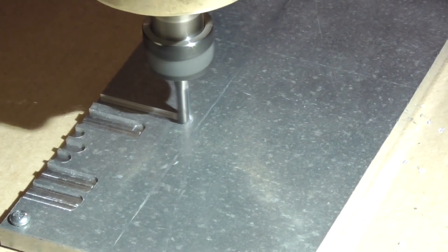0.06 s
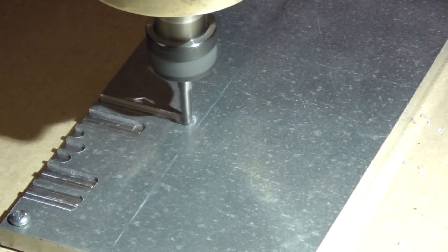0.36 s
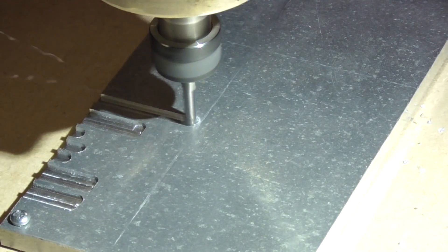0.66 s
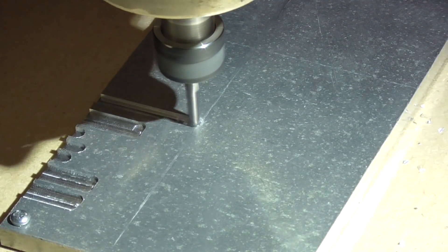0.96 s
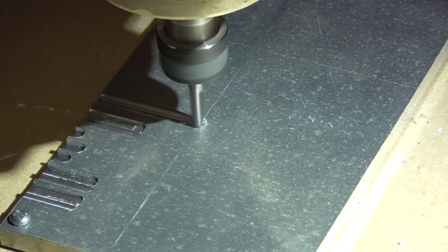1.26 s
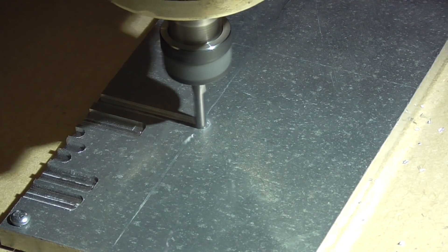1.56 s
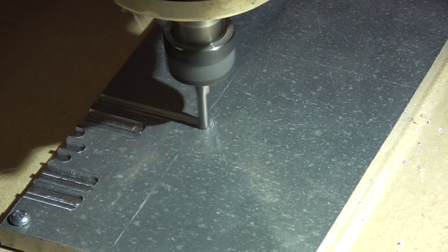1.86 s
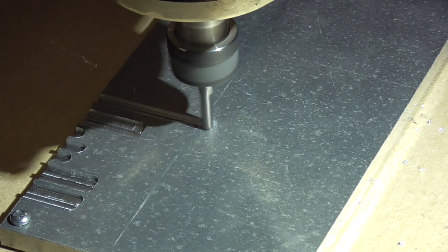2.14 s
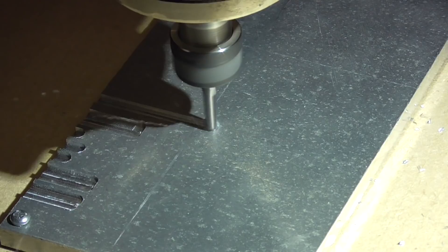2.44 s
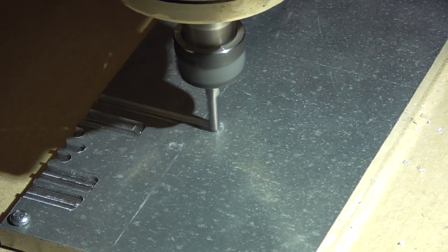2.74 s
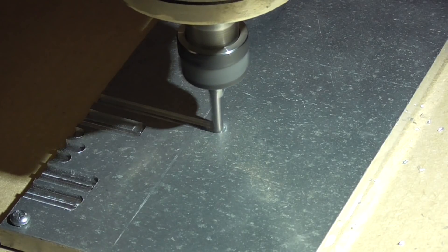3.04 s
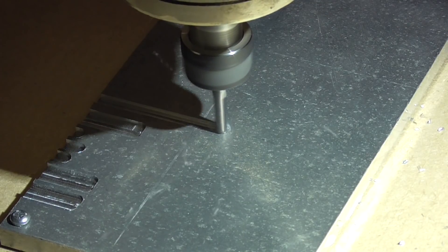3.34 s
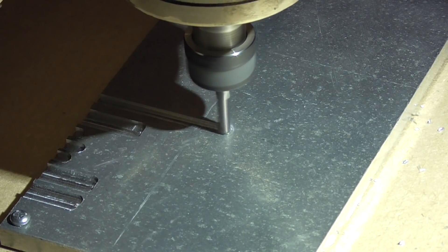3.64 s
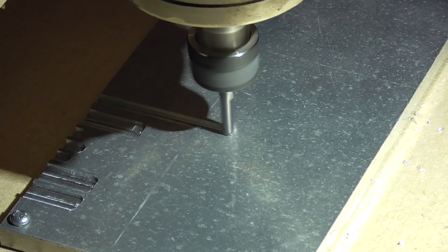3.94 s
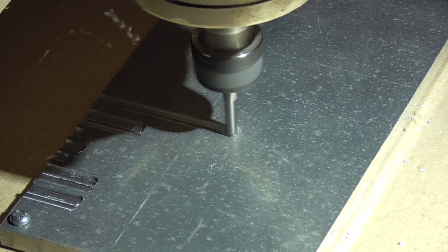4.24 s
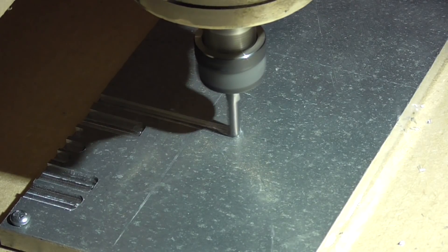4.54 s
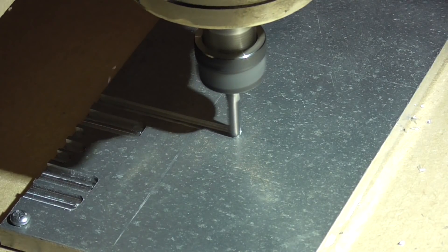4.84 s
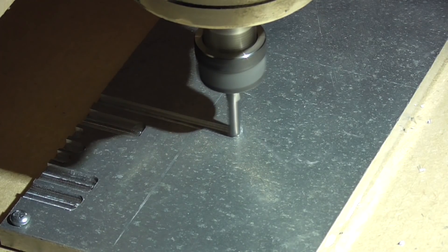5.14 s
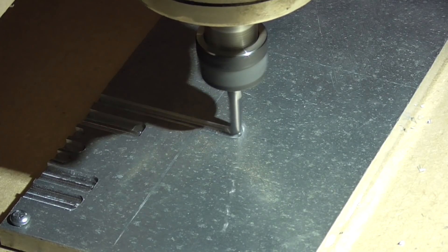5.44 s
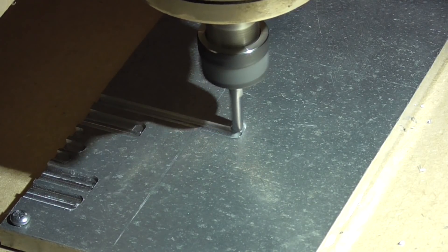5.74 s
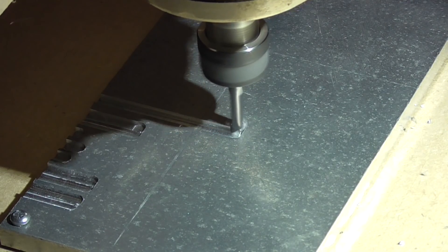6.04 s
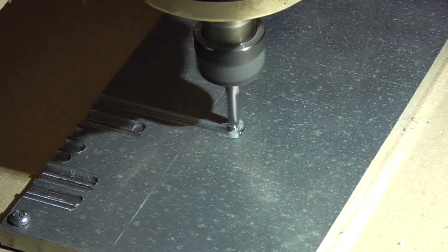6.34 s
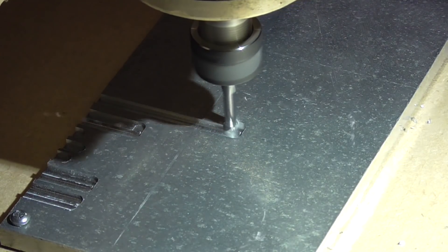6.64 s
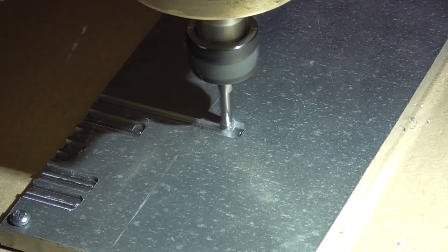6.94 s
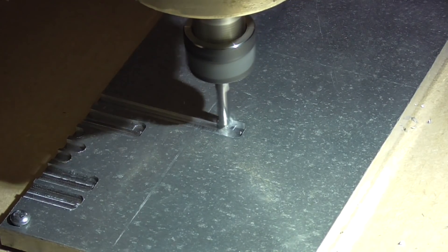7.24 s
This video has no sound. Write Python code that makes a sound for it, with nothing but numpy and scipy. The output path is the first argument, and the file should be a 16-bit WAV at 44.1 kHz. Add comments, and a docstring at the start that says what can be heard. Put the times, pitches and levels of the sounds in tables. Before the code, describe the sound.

A router spindle mills an aluminium plate, heard close up in a workshop. Its steady high whine and motor whistle sit over a cooling fan, while chips hiss and the cutter chatters in ringing bursts. Past halfway the cutter lifts with a brief, piercing squeal, then plunges into the plate with a harder, buzzing drone. At the very end the sound drops abruptly to a thin whine.

```python
"""A router spindle at about 16400 rpm mills an aluminium plate, close by in a workshop.
Over fan, bearings and the whistle of the motor drive, the cutter runs along a slot: its flutes force
the plate to vibrate, chips hiss and chatter comes in bursts. At 4.7 s it rises and friction makes it
squeal. At 5.2 s it plunges into the plate with a harder drone, knocking once a turn.
At 7.3 s the sound drops abruptly to a thin whine."""
import sys
import numpy as np
from scipy import signal
from scipy.fft import rfft, irfft, next_fast_len
from scipy.io import wavfile
from scipy.ndimage import uniform_filter1d

SR = 44100
rng = np.random.default_rng(int(sys.argv[2]) if len(sys.argv) > 2 else 0)


def pcm_store(signal):
    """Save signal as 16-bit PCM."""
    levels = np.round(np.clip(np.atleast_2d(signal), -1, 1) * 32767)
    wavfile.write(sys.argv[1], SR, levels.astype(np.int16).T)


N = 330309
TIME = np.arange(N) / SR
SPINDLE_HZ = 273.85
SLOT_END_S, TOUCH_S, WHINE_START_S = 4.66, 5.18, 7.3423


def amp(db):
    """Decibels to amplitude ratio."""
    return 10 ** (np.asarray(db) / 20)


def curves(rows):
    """Linear interpolation in time of each column after the first."""
    time_s, *columns = np.transpose(rows)
    return [np.interp(TIME, time_s, column) for column in columns]


def swell(at_s, length_s):
    """Gaussian envelope of height 1."""
    return np.exp(-((TIME - at_s) / length_s) ** 2)


def span(start_s, attack_s, end_s, release_s):
    """Trapezoidal envelope: attack, hold at 1 until end_s, release."""
    return np.clip((TIME - start_s) / attack_s, 0, 1) * np.clip(1 - (TIME - end_s) / release_s, 0, 1)


def drift(rate_hz):
    """Slow random fluctuation of rms about 1."""
    knots = rng.standard_normal(4096)
    return 1.16 * np.interp(TIME * 2 * rate_hz, np.arange(len(knots)), knots)


def cycle(turns):
    """Phase in radians within the current turn."""
    return (2 * np.pi * (turns - np.floor(turns))).astype(np.float32)


def tone(turns, waver=0., lead=None, start=None):
    """Sinusoid of rms 1 plus random modulation; with lead, a pair whose left is ahead by lead radians."""
    angle = cycle(turns + (rng.random() if start is None else start))
    if lead is not None:
        angle = angle + np.float32([[lead / 2], [-lead / 2]])
    if not waver:
        return np.sqrt(2) * np.cos(angle)
    return (np.sqrt(2) + waver * drift(14)) * np.cos(angle) + waver * drift(14) * np.sin(angle)


def pan(x, left_db):
    """Placement by level difference; left_db is left minus right."""
    gains = amp([[left_db / 2], [-left_db / 2]])
    return x * (gains / gains.mean())


def resonate(x, hz, width_hz):
    """Damped resonance of peak gain 1; hz may vary in time."""
    angle = cycle(np.cumsum(hz * np.ones(len(x))) / SR)
    pole = np.exp(-np.pi * width_hz / SR)
    carriers = np.cos(angle), np.sin(angle)
    return 2 * sum(carrier * signal.lfilter([1 - pole], [1, -pole], x * carrier) for carrier in carriers)


# Hollows in every noise spectrum: centre_hz, half_width_hz, gain_db
HOLLOWS = [(1730, 55, -3.5), (2593, 58, -9.5), (2980, 130, -4.5), (4110, 68, -5), (5010, 136, -10),
           (6110, 44, -4)]

def noise(spectrum, memory=0., edge_db=40, turn_hz=SPINDLE_HZ, shift_hz=0):
    """Comb filtering: shaped noise repeats the share memory of the turn before, so lines emerge."""
    hz, db = np.transpose(spectrum)
    size = next_fast_len(N, True)
    f = np.fft.rfftfreq(size, 1 / SR) + 1e-3
    octaves_outside = abs(np.log2(f / np.clip(f, hz[0], hz[-1])))
    hollows_db = sum(dip_db / (1 + ((f - dip_hz) / width) ** 2) for dip_hz, width, dip_db in HOLLOWS)
    gain = amp(np.interp(np.log(f), np.log(hz), db) + hollows_db - edge_db * octaves_outside)
    comb = np.sqrt(1 - memory ** 2) / (1 - memory * np.exp(-2j * np.pi * (f - shift_hz) / turn_hz))
    return irfft(rfft(rng.standard_normal(size)) * gain * comb, size)[:N] * np.sqrt(SR / 2)


# Set speed of the spindle: time_s, speed_hz
SPEED = [(0, 273.7), (4.6, 273.8), (4.75, 274.4), (5.25, 274.4), (5.7, 273.8), (6.1, 274.05)]

def spindle_turns(hunt_hz=5.1, hunt=0.00022):
    """Shaft angle in turns, the integral of a slightly hunting speed; order k has k cycles a turn."""
    hunting = 1 + hunt * np.sin(2 * np.pi * hunt_hz * TIME) + 0.0002 * drift(8)
    return np.cumsum(curves(SPEED)[0] * hunting) / SR


def feed_angle(feed_hz=1.9, peak_s=0.35):
    """Phase of the slow modulation imposed by travel along the slot."""
    return 2 * np.pi * feed_hz * (TIME - peak_s)


# Harmonics of the shaft: order; relative_db
SHAFT_ORDERS = [5, 6, 8, 14, 20, 21, 26, 28]
SHAFT_DB = [-61, -58, -53.5, -60, -52.5, -57, -50, -63.5]

def motor(turns, clear, load_db, flutter_hz=11.2):
    """Harmonics of rotation: shaft tones and a fluttering 16th-order whine, weaker out of the cut."""
    # Orders shared with the knock are in quadrature with it, so the two never cancel.
    shaft = sum(amp(db) * tone(k * turns, waver=0.32, start=1 / 4 if k in KNOCK_ORDERS else None)
                for k, db in zip(SHAFT_ORDERS, SHAFT_DB))
    level = amp(-44.5 - 11.0 * clear ** 2 + 0.42 * load_db - 1.2 * full_cut())
    flutter = 1 + 0.091 * tone(flutter_hz * TIME)
    whine = level * flutter * tone(16 * turns + 0.065 * drift(60), waver=0.19)
    return pan(shaft * amp(-1.5 - 6.9 * clear), left_db=6.0) + pan(whine, left_db=1.0)


# Tones of the motor drive, and its highest one: pitch_hz, level_db
DRIVE = [(4627, -40.5), (5452, -62.5), (5726, -52), (6551, -58.5), (7375, -51.5), (11451, -61)]
DRIVE_TOP = [(12550, -58.5)]

def drive_whistle(in_slot, echo=0.21):
    """Interference: the drive's whistle meets its own echo as the spindle travels."""
    whistle = sum(amp(db) * tone(hz * TIME + 0.02 * drift(50), waver=0.17) for hz, db in DRIVE + DRIVE_TOP)
    interference = abs(1 - echo * in_slot * np.exp(1j * feed_angle()))
    return pan(whistle * interference, left_db=-2.0)


# Tones of the frame: pitch_hz, relative_db
FRAME_HUM = [(72, -85.5), (143.5, -67), (238, -76.5)]

def frame_hum(clear):
    """Forced vibration: the frame hums under load and eases when the cutter is clear."""
    hum = sum(amp(db) * tone(hz * TIME, waver=0.086) for hz, db in FRAME_HUM)
    return pan(hum * amp(-2 - 15.4 * clear), left_db=-1.8)


def bearing_tone(pitch_hz=994.0, fade_db=4.5):
    """Random amplitude modulation: a bearing tone comes and goes."""
    level = amp(-53.5 + fade_db * np.tanh(1.2 * drift(3.5)))
    return pan(level * tone(pitch_hz * TIME, waver=0.35), left_db=6.0)


BEAT_HZ = 35.9

def bearing_beat(turns, clear):
    """Beating: a bearing tone lies just above the rotation frequency and grows late in the plunge."""
    level = amp(-66.5) * (1 - clear) + amp(-51.5) * swell(7.27, 0.26)
    return pan(level * tone(turns + BEAT_HZ * TIME), left_db=-4.0)


# Envelope of the once-a-turn hum: time_s, level_db
TURN_HUM = [(0.0, -64.5), (0.55, -51.5), (1.83, -49), (2.19, -60.5), (2.43, -64), (2.53, -56),
            (3.84, -50.5), (4.55, -49), (4.63, -56), (5.08, -46.5), (5.24, -52.5), (7.3, -49.5)]

def turn_hum(turns, in_slot):
    """The fundamental of rotation; it shifts to the right as the cutter leaves the slot."""
    hum = amp(curves(TURN_HUM)[0]) * tone(turns, waver=0.12, lead=0.32)
    return pan(hum * in_slot, left_db=-0.5) + pan(hum * (1 - in_slot), left_db=-10)


# Spectrum of the cooling fan: frequency_hz, density_db
FAN = [(25, -115.8), (60, -107.0), (120, -95), (180, -95.5), (230, -83), (400, -85.5), (580, -80.5),
       (700, -68), (850, -73), (1000, -80), (1200, -76), (1750, -90.5), (2000, -83), (2600, -85.5)]

def fan(clear, rumble_hz=330):
    """Flow noise of air through the housing; the frame's rumble eases while the cutter is clear."""
    loaded = noise(FAN)
    unloaded = signal.sosfilt(signal.butter(1, rumble_hz, "high", fs=SR, output="sos"), noise(FAN))
    air = loaded * np.sqrt(1 - clear) + amp(-1.5) * unloaded * np.sqrt(clear)
    return air * amp(0.33 + .5 * drift(4.6))


# Force of the side cut: time_s, level_db
LOAD = [(0.0, -39), (0.1, -35.5), (0.15, -38.5), (0.73, -36), (1.94, -39), (2.01, -44), (3.19, -39.5),
        (4.55, -39.5)]
# Envelope of the plate's second order: time_s, relative_db
SECOND_ORDER = [(0.0, -44), (0.58, -53.5), (1.05, -38.5), (2.15, -49), (3.59, -46.5), (3.67, -51),
                (4.55, -47.5)]
# Its higher harmonics: order; level_db, load_share, feed_swell_db, left_db, lead_rad
SLOT_ORDERS = [3, 4]
SLOT_TONES = [(-41.5, 0.13, 2.5, -2.5, .07), (-36, 0.87, -0.1, -3.5, 0.31)]

def side_cut(turns, in_slot, load_db, graze=.25):
    """Forced vibration: the flutes shake the plate harder under load, swelling with the feed."""
    feed = np.cos(feed_angle())
    second = amp(curves(SECOND_ORDER)[0] + 2) * tone(2 * turns, waver=0.26, lead=2.39)
    shake = pan(second, left_db=-2.5)
    for k, (db, load_share, swell_db, left_db, lead) in zip(SLOT_ORDERS, SLOT_TONES):
        level = amp(db + load_share * load_db + swell_db * feed)
        shake += pan(level * tone(k * turns, waver=0.053, lead=lead), left_db)
    sizzle = amp(-54 + 2.0 * load_db) * tone(28 * turns, waver=0.55)
    grazing = graze * span(SLOT_END_S - .05, .05, SLOT_END_S, 0.46)  # flutes brush the wall on the way up
    return np.maximum(in_slot, grazing) * shake + in_slot * pan(sizzle, left_db=-6)


# Bursts of chatter: start_s, attack_s, end_s, release_s, level_db
CHATTER_BURSTS = [(.085, .03, .4, .4, -44), (1.36, .08, 1.48, .24, -43.5), (1.62, .16, 3.38, .22, -43.3),
                  (1.9, .08, 2.2, 1.4, -40.5), (3.48, .12, 3.8, .5, -42), (4.03, .07, 4.15, .7, -41.5),
                  (4.38, .23, 4.645, .04, -40.5), (5.47, .1, 5.62, .25, -51), (5.71, .08, 6.03, .04, -42)]

def chatter_strength(in_slot, idle_db=-53, tremble_db=.85, tremble_hz=10):
    """Growth and decay of chatter: wavering bursts rise above a weak vibration along the slot."""
    bursts = np.max([amp(db) * span(*timing) for *timing, db in CHATTER_BURSTS], axis=0)
    return np.maximum(bursts, amp(idle_db) * in_slot) * amp(tremble_db * drift(tremble_hz))


# Carrier and sidebands of the chatter: offset_orders; relative_db
SIDEBANDS = [-4, -1, 0, 1, 2, 3]
SIDEBAND_DB = [-14, -21, 1.5, -19, -22, -11.5]
CHATTER_HZ = 2381

def chatter(turns, strength, in_slot, rise_hz=50, wander_hz=3):
    """Modulation: the cutter rings at its own pitch, chopped once a turn into sidebands."""
    leaving_wall = swell(SLOT_END_S + 0.016, 0.0392)
    ring_cycles = np.cumsum(CHATTER_HZ + rise_hz * leaving_wall + wander_hz * drift(25)) / SR
    chopped = in_slot + 0.83 * (1 - in_slot)
    lines = sum(amp(db) * tone(ring_cycles + k * turns, waver=0.25) * (chopped if k else 1)
                for k, db in zip(SIDEBANDS, SIDEBAND_DB))
    return pan(strength * lines, left_db=4.5)


# Spectrum of chips and rubbing metal: frequency_hz, relative_density_db
CHIP_HISS = [(2600, -87.5), (3200, -83), (3850, -80.5), (4900, -78.5), (5600, -82), (6150, -81),
             (7200, -80), (8400, -82.5), (9500, -81.5), (11000, -89.5), (12200, -94.5), (13700, -100),
             (15300, -112.9)]

def chips(turns, strength, clear, load_db, in_slot, stroke_memory=.9):
    """Modulated noise: chips hiss in pulses once and twice a turn; the slot's wall adds a low rasp."""
    pulses = 1 + 0.13 * tone(turns) + 0.093 * tone(2 * turns) + 0.077 * drift(130)
    # The cutter radiates its treble best.
    bright = [(hz, db + 3.1 * np.clip(np.log2(hz / 4500), 0, 1)) for hz, db in CHIP_HISS]
    loose = amp(-2.5 - 1.9 * clear) * noise(bright, memory=0.31)
    repeating = amp(-4.0) * noise(bright, stroke_memory)
    grind = strength * amp(37 + 4 * (1 - in_slot)) * noise(bright, stroke_memory, shift_hz=CHATTER_HZ)
    steady = amp(-0.04 - 2.2 * clear + 0.23 * load_db - 0.2 * full_cut())
    exit_scrape = 0.96 * swell(4.672, 0.015)
    hiss = (loose + repeating) * (steady + exit_scrape) + grind
    rasp = noise([(1950, -89.5), (2450, -92)]) * (1 - clear) * (1 - full_cut())
    return pan(hiss * pulses * amp(0.67 * drift(14)) + rasp, left_db=-3.0)


def workshop(clear):
    """Diffuse reflection: fan and chip noise return from the walls, left and right in antiphase."""
    diffuse = amp(-6.0) * fan(clear) + amp(-11.5) * noise(CHIP_HISS, memory=0.32)
    return np.array([[1], [-1]]) * diffuse


# Modes of cutter and plate: pitch_hz, width_hz, gain_db
METAL_MODES = [(7200, 290, 8), (8080, 210, 2), (9240, 900, 2), (10900, 820, 1)]
# Spectrum of the rubbing flutes: frequency_hz, density_db
SQUEAL_HISS = [(7000, -82), (11800, -81), (13400, -83), (14500, -99)]
# Harmonics the squeal locks onto: order; start_s, attack_s, end_s, release_s, level_db
LOCK_ORDERS = [42, 39, 40, 30, 26, 28]
LOCKS = [(4.645, .03, 4.7, .08, -38), (4.675, .025, 4.79, .31, -33), (4.68, .04, 4.98, .08, -41),
         (4.94, .18, 5.187, .016, -36), (5.07, .09, 5.188, .016, -35.5), (5.02, .1, 5.185, .016, -42)]

def squeal(turns, start_s=4.645, end_s=5.187, turn_hz=274.2, spread_hz=2600):
    """Friction excites the metal's modes: the squeal starts high, fades, then drops and flares."""
    age_s = np.clip(TIME - start_s, 0, 1)
    drop = np.exp(np.minimum(TIME - end_s, 0) / .07)
    centre_hz = 10550 - 600 * age_s - 2900 * drop + 1400 * swell(start_s, 0.071)
    fade_db = -13 * age_s + 2.5 * swell(5.12, 0.056)
    scrape = noise([(6800, 4), (11800, -3.0), (13500, -11)], memory=0.924, edge_db=44, turn_hz=turn_hz)
    scrape *= 1 + 0.17 * tone(turns)
    rub = resonate(resonate(scrape, centre_hz, spread_hz), centre_hz, spread_hz)
    rub += amp(-24) * (1 - drop) * scrape
    ring = amp(-8) * rub + sum(amp(db) * resonate(rub, hz, width) for hz, width, db in METAL_MODES)
    ring /= np.sqrt(uniform_filter1d(ring ** 2, size=500))  # friction holds the swing steady
    hiss = noise(SQUEAL_HISS, memory=0.75, turn_hz=turn_hz) * (1 - drop)
    locked = sum(amp(db) * span(*timing) * tone(k * turns, waver=0.27)
                 for k, (*timing, db) in zip(LOCK_ORDERS, LOCKS))
    rubbing = amp(fade_db) * (amp(-30) * ring + hiss) + locked
    return pan(rubbing * span(start_s, 0.043, end_s, 0.023), left_db=-5)


def free_spindle(turns):
    """The fourth harmonic of rotation sounds while the spindle runs free."""
    return amp(-47.5) * span(SLOT_END_S, 0.041, TOUCH_S, 0.039) * tone(4 * turns, waver=0.17)


# Stages of the plunge (touch, bite of one flute, sinking cone, full cut), before deepening:
# start_s, attack_s, end_s, release_s, knock_db, order_2_db, order_3_db, order_4_db
PLUNGE_STAGES = [(5.195, 0.015, 5.23, 0.032, -55, -65, -44, -39),
                 (5.2, 0.057, 5.33, 0.3, -46, -51.5, -36, -56),
                 (5.3, 0.35, 5.766, 0.43, -41, -42.5, -50.5, -40.5),
                 (6.035, 0.039, 7.51, .05, -41, -48, -34, -39.5)]
# Placement of orders 2, 3 and 4: left_db, lead_rad
PLUNGE_PLACES = [(7, 0.52), (-3, .2), (-4, 0.59)]
# Harmonics of the knock: order; relative_db
KNOCK_ORDERS = [5, 6, 7, 8, 9, 10, 11, 13, 14]
KNOCK_DB = [-0.5, -12.5, -10.5, -15, -7.5, -28, -21, -16.5, -22.5]
# Harmonics that throb with the bearing's beat: order
THROB_ORDERS = [2, 4, 5, 6]

def plunge(turns, deepen_db_per_s=2.5, throb_depth=.25, yield_width_hz=600):
    """Periodic impact: the tip knocks once a turn and shakes the plate, harder as it sinks."""
    levels, knock_level = 0, 0
    for start, attack, end, release, knock_db, *order_db in PLUNGE_STAGES:
        envelope = span(start, attack, end, release)
        levels += amp(order_db)[:, None] * envelope * amp(deepen_db_per_s * (TIME - start))
        knock_level += amp(knock_db) * envelope
    beat = throb_depth * full_cut() * tone(BEAT_HZ * TIME)
    chattering = span(*CHATTER_BURSTS[-1][:4])

    def throb(k):
        """Amplitude modulation of order k by the beat; orders near the chatter's pitch give way to it."""
        give_way = 0.98 * chattering * np.exp(-((k * SPINDLE_HZ - CHATTER_HZ) / yield_width_hz) ** 2)
        return (1 + beat * (k in THROB_ORDERS)) * (1 - give_way)

    shake = sum(pan(level * throb(k) * tone(k * turns, waver=0.096, lead=lead), left_db)
                for k, (level, (left_db, lead)) in enumerate(zip(levels, PLUNGE_PLACES), 2))
    knock = sum(amp(db) * throb(k) * np.cos(cycle(k * turns)) for k, db in zip(KNOCK_ORDERS, KNOCK_DB))
    return shake + pan(-np.sqrt(2) * knock_level * knock, left_db=1.0)


def full_cut():
    """Envelope of the last stage of the plunge."""
    return span(*PLUNGE_STAGES[-1][:4])


# Brief rings of the tip: order; peak_s, length_s, level_db
TIP_ORDERS = [8, 6, 9, 10]
TIP_RINGS = [(5.34, 0.084, -43), (5.36, 0.057, -49), (5.58, 0.072, -46), (5.63, 0.12, -51.5)]

def tip_rings(turns):
    """Resonance: the tip rings on single harmonics as it digs in."""
    rings = -sum(amp(db) * swell(peak_s, length_s) * np.cos(cycle(k * turns))
                 for k, (peak_s, length_s, db) in zip(TIP_ORDERS, TIP_RINGS))
    return pan(rings, left_db=1.0)


# The thin whine at orders 8, 16, 24 and on: level_db
WHINE_DB = [-63, -58, -44.5, -49.5, -55.5, -69, -65]
# Faint tones under it: pitch_hz, level_db
WHINE_HUM = [(580, -86), (1155, -78)]
# Spectrum of its hiss: frequency_hz, relative_density_db
WHINE_HISS = [(500, -131), (2300, -96), (3400, -103), (6200, -94), (15500, -108)]

def thin_whine(turns, flutter_hz=290):
    """A harmonic series on the spindle's eighth order, fluttering, over faint hum and hiss."""
    lines = sum(amp(db) * tone(8 * k * turns, waver=0.072) for k, db in enumerate(WHINE_DB, 1))
    hum = sum(amp(db) * tone(hz * TIME) for hz, db in WHINE_HUM)
    flutter = 1 + 0.072 * tone(flutter_hz * TIME)
    return pan((lines + hum) * flutter + amp(3.0) * noise(WHINE_HISS), left_db=-3.5)


def scene(usual_load_db=-38.5):
    """Superposition of side cut, lift and plunge, which give way abruptly to the thin whine."""
    turns = spindle_turns()
    in_slot = np.clip((SLOT_END_S - TIME) / 0.063 + .5, 0, 1)
    clear = span(SLOT_END_S, 0.019, TOUCH_S, 0.41)  # 1 while the cutter is out of the cut
    load_db = (curves(LOAD)[0] - usual_load_db) * in_slot
    strength = chatter_strength(in_slot)
    milling = side_cut(turns, in_slot, load_db) + plunge(turns) + tip_rings(turns)
    milling += turn_hum(turns, in_slot) + free_spindle(turns) + bearing_beat(turns, clear)
    milling += motor(turns, clear, load_db) + drive_whistle(in_slot) + frame_hum(clear) + bearing_tone()
    milling += chatter(turns, strength, in_slot) + chips(turns, strength, clear, load_db, in_slot)
    milling += squeal(turns)
    milling += (pan(fan(clear), left_db=-2.0) + workshop(clear)) * amp(0.43 * load_db)
    whine_share = .5 + .5 * np.tanh((TIME - WHINE_START_S) / .0008)
    return (1 - whine_share) * milling + whine_share * thin_whine(turns)


def record(dry, edge_hz=15500):
    """Band limiting: a steep low-pass filter removes the highest treble."""
    lowpass = signal.firwin(511, edge_hz, window=("kaiser", 9), fs=SR)
    return signal.oaconvolve(dry, lowpass[None], "same")


dry = scene()
out = record(dry)
pcm_store(out)
```